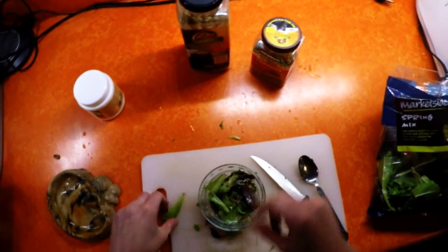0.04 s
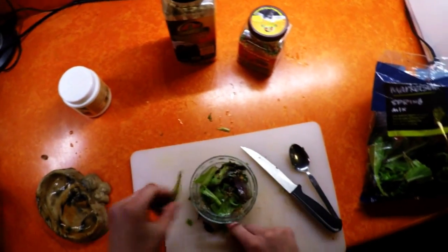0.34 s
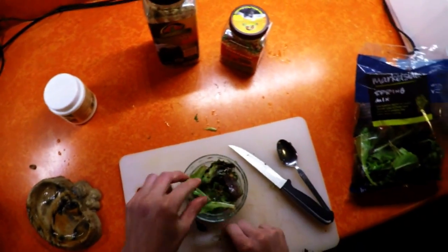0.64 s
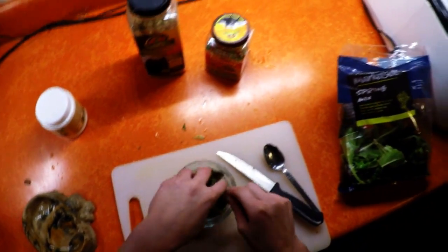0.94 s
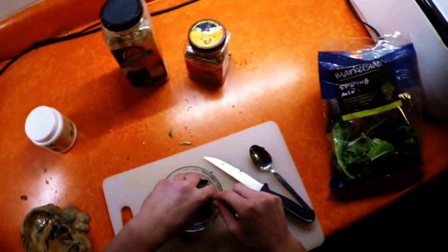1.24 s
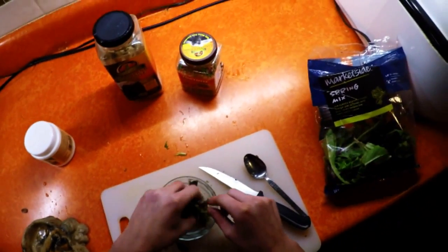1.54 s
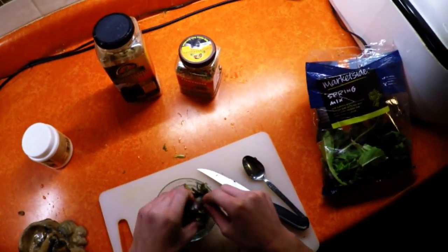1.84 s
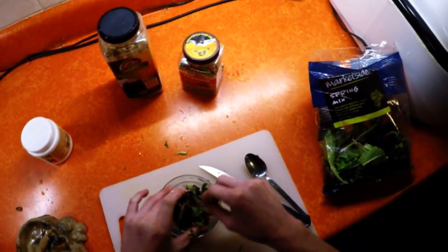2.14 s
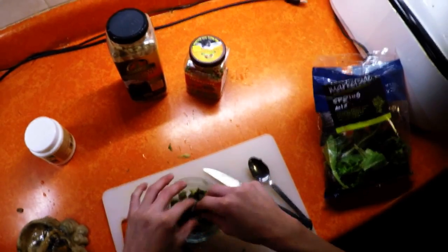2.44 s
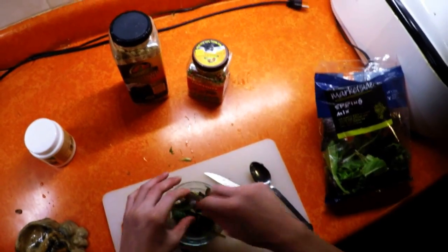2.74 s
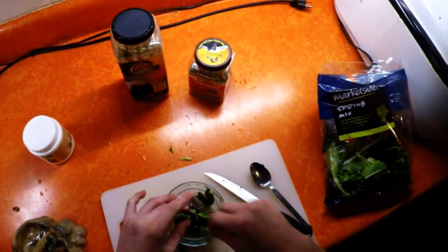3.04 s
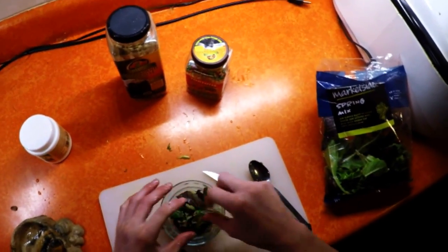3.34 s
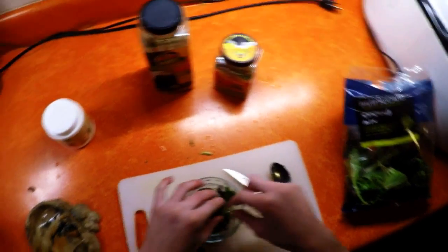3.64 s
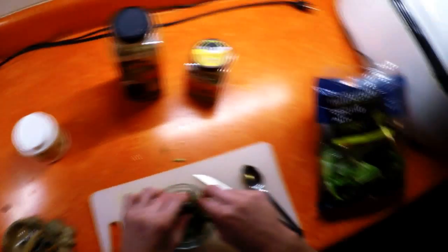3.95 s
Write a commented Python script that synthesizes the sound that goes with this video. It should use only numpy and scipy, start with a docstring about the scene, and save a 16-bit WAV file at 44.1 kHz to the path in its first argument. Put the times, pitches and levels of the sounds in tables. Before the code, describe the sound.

Leafy greens are torn by hand near the microphone in a kitchen. Faint rustling leads to snapping stems, a brief rip and small bumps of a bowl on a board, over a throbbing hum, room hiss and fast soft thumps.

```python
"""Tearing salad leaves

Hands snap and tear leaves over a small glass bowl on a kitchen table. Stems crack in brief bursts,
one leaf rips in a short hiss of tiny ruptures, and the air in the bowl resonates with both.
Nudges set the bowl ringing on its board. Behind it an appliance hums and throbs,
the room hisses, and a soft thump repeats about ten times a second."""
import sys
import numpy as np
from scipy import signal
from scipy.fft import rfft, irfft
from scipy.io import wavfile

SR = 44100
rng = np.random.default_rng(int(sys.argv[2]) if len(sys.argv) > 2 else 0)


def output_pcm(signal):
    """Save a mono or channel-first signal as 16-bit PCM at the path in sys.argv[1].

    Samples are clipped to [-1, 1] before scaling.
    """
    pcm = np.clip(np.atleast_2d(signal).T, -1, 1) * 32767
    wavfile.write(sys.argv[1], SR, np.round(pcm).astype(np.int16))


N = 176400
T = np.arange(N) / SR
GRAINS_PER_S = 9000


def from_db(db):
    """Amplitude ratio: a factor of ten for every 20 dB."""
    return 10 ** (np.asarray(db) / 20)


def unit_rms(x):
    """Normalisation to a mean power of one."""
    return x / np.sqrt(np.mean(x ** 2) + 1e-20)


def decay(start, decay_s):
    """Exponential decay from a sudden onset."""
    return (T >= start) * np.exp(-np.maximum(T - start, 0) / decay_s)


def gaussian(t, width_s):
    """Gaussian pulse of unit height, centred on t = 0."""
    return np.exp(-(t / width_s) ** 2 / 2)


def drift(rate_hz):
    """Low-pass noise: a slow random fluctuation of unit rms."""
    hz = np.arange(N // 2 + 1) * SR / N
    return unit_rms(irfft(rfft(rng.standard_normal(N)) / (1 + (hz / rate_hz) ** 2), N))


def colour(x, spectrum):
    """Minimum-phase filter that follows a spectrum and conserves the power of white noise."""
    hz = np.maximum(np.arange(N + 1) * SR / (2 * N), 1)
    point_hz, point_db = np.transpose(spectrum)
    gain = unit_rms(from_db(np.interp(np.log(hz), np.log(point_hz), point_db)))
    cepstrum = irfft(np.log(gain))
    cepstrum[1:N] *= 2  # folding onto positive time makes the filter causal
    cepstrum[N + 1:] = 0
    return irfft(rfft(x, 2 * N) * np.exp(rfft(cepstrum)))[:N]


def resonance(x, hz, q):
    """Second-order resonator with unit peak gain and bandwidth hz / q."""
    return signal.lfilter(*signal.iirpeak(hz, q, fs=SR), x + 1e-18)


def gliding_resonance(x, hz, width_hz):
    """Heterodyne resonator: shift down by a moving frequency, low-pass, shift back."""
    carrier = np.exp(2j * np.pi * np.cumsum(hz) / SR)
    radius = np.exp(-np.pi * width_hz / SR)
    return 2 * np.real(carrier * signal.lfilter([1 - radius], [1, -radius], x / carrier))


def damped_mode(x, hz, t60):
    """Damped oscillator: a unit impulse starts a unit sine that falls 60 dB in t60 seconds."""
    radius, angle = from_db(-60 / (t60 * SR)), 2 * np.pi * hz / SR
    return signal.lfilter([0, np.sin(angle)], [1, -2 * radius * np.cos(angle), radius ** 2], x + 1e-18)


def grains():
    """Shot noise: a dense train of random impulses of uneven size, as from tiny ruptures."""
    size_db = 4 * np.minimum(rng.exponential(1, N), 4)
    impulses = from_db(size_db) * rng.choice([-1, 1], N)
    return unit_rms(impulses * (rng.random(N) < GRAINS_PER_S / SR))


def contact(start, trail_db, decay_s):
    """Impulsive excitation: a unit click and a decaying trail of grains, its energy set by trail_db."""
    burst = from_db(trail_db) * unit_rms(grains() * decay(start, decay_s)) / np.sqrt(N)
    burst[int(start * SR)] -= 1
    return burst


def room_noise():
    """Stationary broadband noise, with most of its power in the bass."""
    # noise spectrum: f/Hz, relative spectral density/dB
    spectrum = [(12, -4.5), (25, 7), (42, -16.5), (60, 1), (80, -3.5), (130, -13), (200, -17), (330, -13.5),
                (500, -18.5), (800, -29), (1300, -37), (2200, -37.5), (3200, -40.5), (4800, -42),
                (7000, -48), (11000, -51), (15000, -55)]
    return from_db(-34.5) * colour(rng.standard_normal(N), spectrum)


def appliance(in_phase_s=.31):
    """Beating: three close low tones interfere in a throb, under hum tones that waver in amplitude."""
    # beating tones: f/Hz, relative level/dB
    throb_tones = [(56.31, -31), (59.12, -33), (61.95, -38)]
    # hum tones: f/Hz, rms level/dB
    hum_tones = [(29, -31.5), (60, -30.5), (120, -37.5), (240, -54), (265, -51.5), (298, -54.5), (302, -49),
                 (306, -55), (323, -50.5), (332, -54), (352, -51), (360, -49.5), (381, -63), (385, -54),
                 (410, -58), (422, -59), (451, -57.5), (484, -57), (600, -58), (695.5, -63.5),
                 (728.8, -63.5), (935.5, -64), (1133.2, -65.5), (1949, -75.5), (2638, -82), (2708, -78.5)]
    phase = rng.random()
    throb = sum(from_db(db) * np.sin(2 * np.pi * (hz * (T - in_phase_s) + phase))
                for hz, db in throb_tones)
    hum = np.zeros(N)
    for hz, db in hum_tones:
        waver = 1 + .18 * drift(rate_hz=6)
        hum += from_db(db) * waver * np.sin(2 * np.pi * (hz * T + rng.random()))
    return np.sqrt(2) * (from_db(-1.5) * throb + hum)


def thumps(rate_hz=9.768, first_s=.095, tick_s=.00021, rebound_hz=33.7, rebound_q=2.2):
    """Periodic pressure dips, each led by two dull ticks; a resonant high-pass adds a bass rebound."""
    # ticks ahead of each dip: lead/s, level/dB, sign (+1 deepens the dip)
    ticks = [(.004, -38, -1), (.0018, -36, 1)]
    offset_s = (((T - first_s) * rate_hz + .5) % 1 - .5) / rate_hz  # time from the nearest dip
    dips = from_db(-20.5) * gaussian(offset_s, width_s=.00089)
    for lead_s, db, sign in ticks:
        age = np.maximum(offset_s + lead_s, 0) / tick_s
        dips += sign * from_db(db) * age * np.exp(1 - age)
    omega = 2 * np.pi * rebound_hz
    highpass = signal.bilinear([1, 0, 0], [1, omega / rebound_q, omega ** 2], SR)
    return signal.lfilter(*highpass, -dips)


def kitchen(x, delay_s=.0045, t60=.29):
    """Reverberation: scattered early reflections and a short diffuse tail follow the direct sound."""
    early = unit_rms(rng.standard_normal(N) * decay(delay_s, decay_s=.003))
    tail = unit_rms(rng.standard_normal(N) * decay(delay_s, t60 / np.log(1000)))
    response = from_db(-7.5) * (early + tail) / np.sqrt(N)
    return x + signal.fftconvolve(x, response)[:N]


def bowl_cavity(x):
    """Cavity resonance: the air in the hollow of bowl and hands reinforces three narrow bands."""
    # air resonances: f/Hz, bandwidth/Hz, relative level/dB
    air_modes = [(2520, 110, -4), (3500, 100, -18), (4600, 120, -8)]
    resonant = sum(from_db(db) * resonance(x, hz, q=hz / width_hz) for hz, width_hz, db in air_modes)
    return from_db(-1) * (x + resonant)


def bowl_knocks(swell_hz=61):
    """Modal vibration: nudges bump and scuff the bowl on its board; pressing hands swell the bass."""
    # nudges: t/s, click level/dB, scuff level re click/dB
    nudges = [(3.371, -40, -6), (3.381, -33, -6), (3.4235, -31, 3), (3.4975, -34, -4)]
    # modes of the bowl on the board: f/Hz, gain/dB, T60/s
    modes = [(131, 9, 0.031), (222, 1.5, 0.024), (488, -6, 0.025), (660, -3.5, 0.013), (1010, -20, 0.0072),
             (1340, -19, 0.02), (1950, -29, 0.013)]
    # presses of the hands: t/s, width/s, peak level/dB
    presses = [(3.148, .035, -16.5), (3.26, .05, -21)]
    force = sum(from_db(db) * contact(t, scuff_db, decay_s=.012) for t, db, scuff_db in nudges)
    ringing = sum(from_db(db) * damped_mode(force, hz, t60) for hz, db, t60 in modes)
    swell = sum(from_db(db) * gaussian(T - t, width_s) for t, width_s, db in presses)
    return ringing + swell * np.sin(2 * np.pi * (swell_hz * T + rng.random()))


def wet_fizz():
    """Narrow-band shot noise: a very fine crackle where wet leaf surfaces part."""
    # partings: t/s, width/s, relative level/dB
    partings = [(0.560, .006, -61), (1.222, .018, -61), (1.285, .02, -64)]
    crackle = rng.standard_normal(N) * (rng.random(N) < GRAINS_PER_S / SR)
    envelope = sum(from_db(db) * gaussian(T - t, width_s) for t, width_s, db in partings)
    return from_db(4.5) * envelope * unit_rms(resonance(crackle, hz=13300, q=5.2))


def leaf_rubs(edge_ratio=1.7):
    """Friction noise: leaves slide over each other in soft rustles, each in its own band."""
    # strokes: t/s, attack/s, hold/s, release/s, level/dB, centre f/Hz
    strokes = [(0.078, .008, .015, .02, -57, 2600), (0.43, .04, .05, .06, -56.5, 1900),
               (0.60, .05, .1, .1, -59, 1900), (0.85, .08, .1, .08, -61, 4000),
               (1.064, .005, .015, .02, -56, 3000), (1.22, .01, .035, .02, -56, 4800),
               (3.09, .05, .1, .06, -57, 1900), (3.49, .08, .08, .11, -55, 2050)]
    friction, out = grains(), np.zeros(N)
    for t, attack, hold, release, db, hz in strokes:
        rise = np.clip((T - t) / attack, 0, 1)
        fall = np.exp(-2 * np.maximum(T - t - attack - hold, 0) / release)
        band = signal.butter(2, [hz / edge_ratio, hz * edge_ratio], "band", fs=SR, output="sos")
        out += from_db(db) * rise * fall * unit_rms(signal.sosfilt(band, friction))
    return out


def leaf_tear(top_hz=6500, top_fade_db_per_s=69):
    """Progressive fracture: rupturing cells climb from a rasp to a hiss while the top treble dies away."""
    # course of the tear: t/s, relative level/dB, rasp f/Hz, rasp gain/dB, hiss f/Hz, hiss gain/dB
    course = [(2.575, -62, 2000, 0, 4300, -6), (2.592, -48, 2000, 5, 4300, -8),
              (2.599, -43.5, 2050, 13, 4400, -12), (2.614, -41.5, 2550, 7, 4500, -14),
              (2.632, -41, 2300, 5, 4750, -3), (2.656, -41, 2650, 0, 4900, -7),
              (2.675, -41.5, 2600, -5, 5900, 5), (2.70, -45, 2550, -1, 5100, -4),
              (2.76, -60, 2600, -4, 4800, -8)]
    # spectral envelope of the leaf: f/Hz, relative level/dB
    spectrum = [(900, -2.5), (1500, -12.5), (1900, -1.5), (2600, -1), (3050, -0.5), (4500, -3.5),
                (6200, -8.5), (7200, -5.5), (10000, -10), (14500, -16.5)]
    t, db, rasp_hz, rasp_db, hiss_hz, hiss_db = np.transpose(course)
    ruptures = grains()
    top = irfft(rfft(ruptures) * (np.arange(N // 2 + 1) * SR / N > top_hz), N)
    top_gain = from_db(-top_fade_db_per_s * np.maximum(T - t[0], 0))
    rasp = gliding_resonance(ruptures, np.interp(T, t, rasp_hz), width_hz=590)
    hiss = gliding_resonance(ruptures, np.interp(T, t, hiss_hz), width_hz=700)
    rip = ruptures - top + top_gain * top
    rip += from_db(np.interp(T, t, rasp_db)) * rasp
    rip += from_db(np.interp(T, t, hiss_db)) * hiss
    envelope = np.interp(T, t, from_db(db), left=0, right=0)
    return from_db(-2.5) * colour(envelope * rip, spectrum)


def stem_snaps(treble_hz=11500):
    """Brittle fracture: a crack and a brief crumbling excite each stem's own broad resonance."""
    # fractures: t/s, relative level/dB, stem f/Hz, treble gain/dB, crumbling time constant/s
    fractures = [(1.0588, -36.5, 4400, -6, .002), (1.0612, -42, 7600, -8, .006),
                 (1.2065, -46, 4100, -6, .001), (1.2134, -38, 4100, -6, .002), (1.2180, -40, 4000, 2, .004),
                 (1.2718, -24, 5600, -20, .0007), (1.2898, -33, 3600, -4, .002),
                 (1.2942, -34, 4100, -2, .005), (2.444, -48, 3300, -6, .003), (3.222, -48, 4000, 2, .004)]
    # spectral envelope of a snap: f/Hz, relative level/dB
    spectrum = [(900, -31), (1500, -7.5), (2200, 5), (2900, -6.5), (3600, 1), (4400, -3.5), (5500, -8.5),
                (6500, -10), (8000, -17), (11000, -21), (13000, -37), (15000, -27)]
    highpass = signal.butter(2, treble_hz, "high", fs=SR, output="sos")
    out = np.zeros(N)
    for t, db, hz, treble_db, crumble_s in fractures:
        crack = contact(t, trail_db=2.5, decay_s=crumble_s)
        stem = from_db(1) * resonance(crack, hz, q=2)
        treble = from_db(treble_db) * signal.sosfilt(highpass, crack + 1e-18)
        out += from_db(db) * (crack + stem + treble)
    return from_db(10) * colour(out, spectrum)


def scene():
    """Superposition: the leaves, coloured by bowl and kitchen, add to the other sources in one channel."""
    background = room_noise()
    leaves = kitchen(bowl_cavity(stem_snaps() + leaf_tear() + leaf_rubs()))
    return (background + leaves + bowl_knocks() + appliance() + thumps() + wet_fizz())[None]


def record(dry):
    """Band limiting: a steep elliptic low-pass removes the highest treble."""
    return signal.sosfilt(signal.ellip(10, .3, 80, 15300, fs=SR, output="sos"), dry)


dry = scene()
out = record(dry)
output_pcm(out)
```